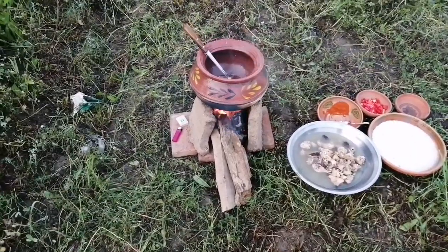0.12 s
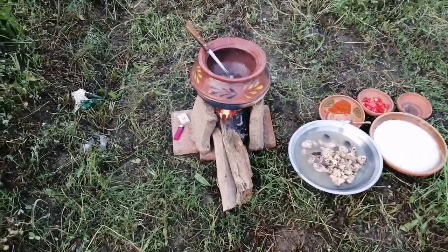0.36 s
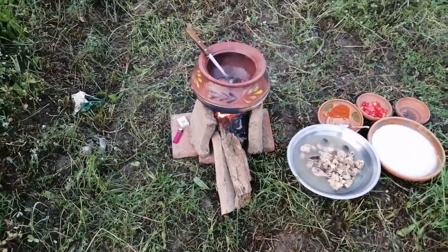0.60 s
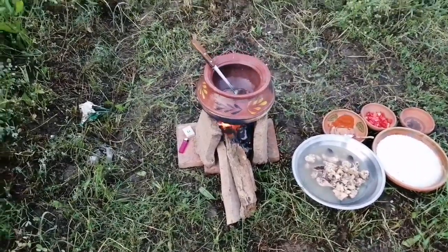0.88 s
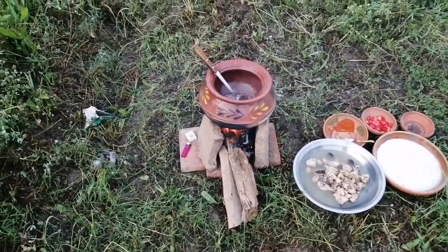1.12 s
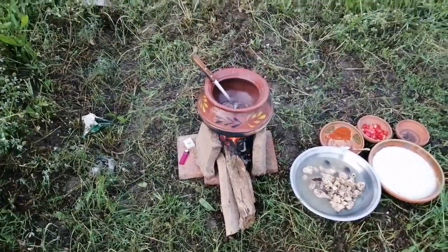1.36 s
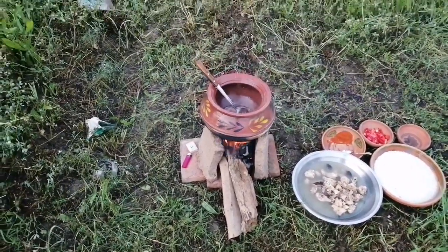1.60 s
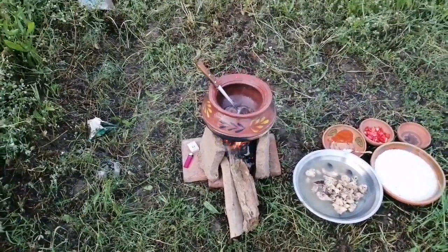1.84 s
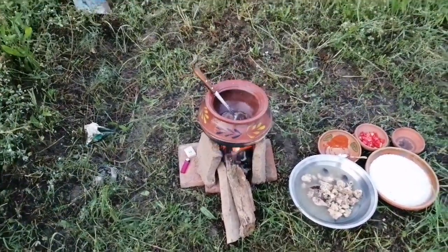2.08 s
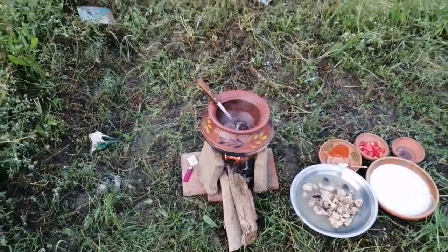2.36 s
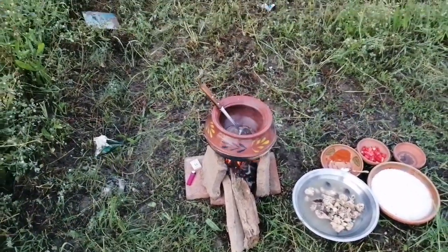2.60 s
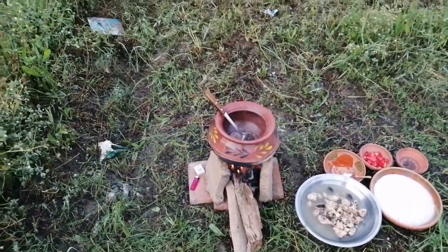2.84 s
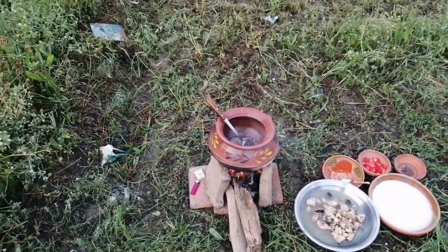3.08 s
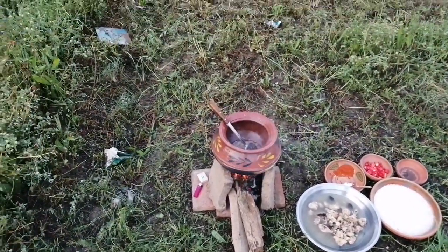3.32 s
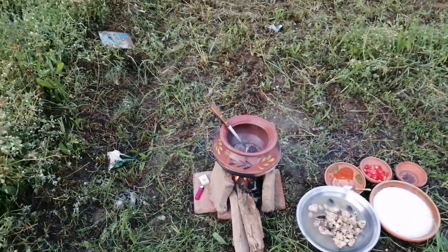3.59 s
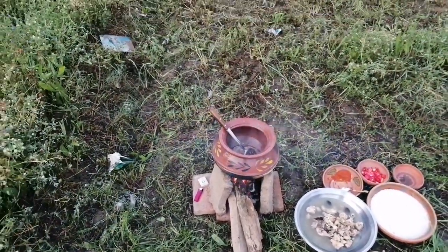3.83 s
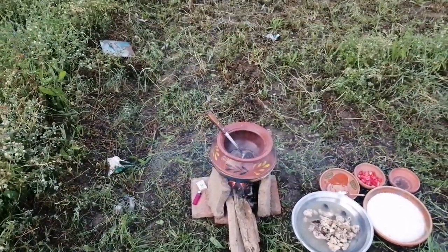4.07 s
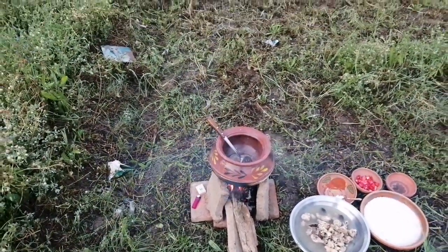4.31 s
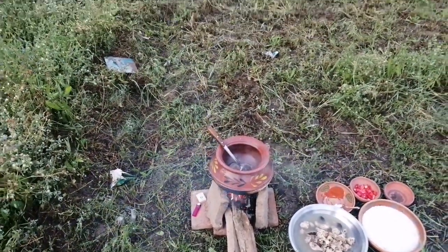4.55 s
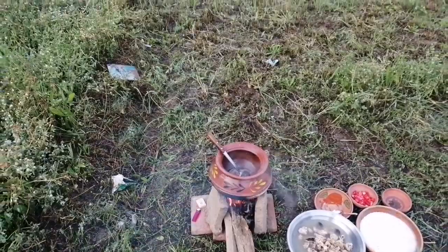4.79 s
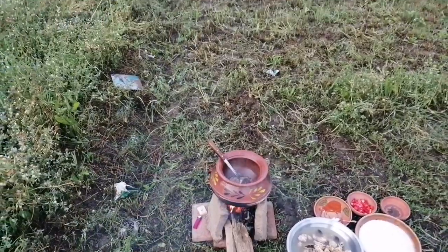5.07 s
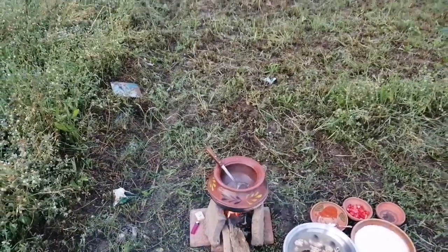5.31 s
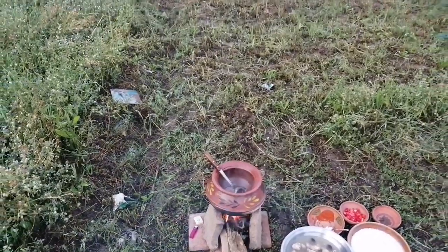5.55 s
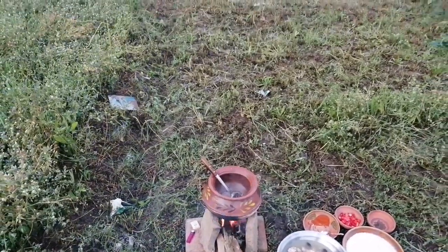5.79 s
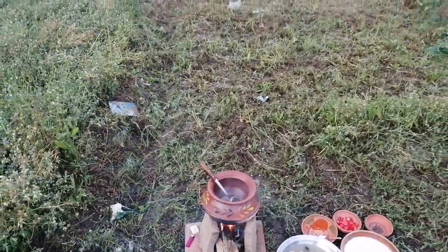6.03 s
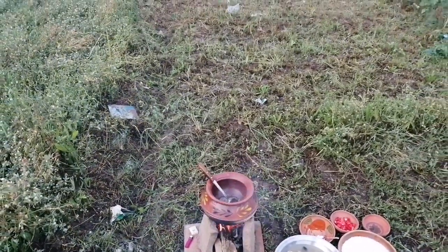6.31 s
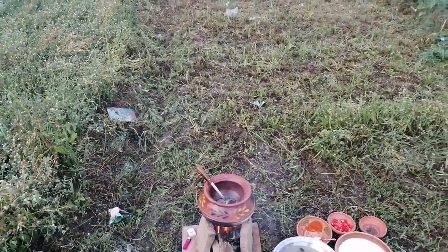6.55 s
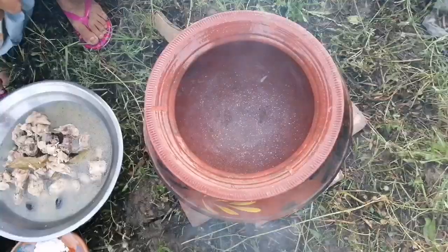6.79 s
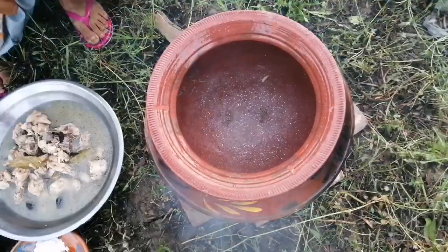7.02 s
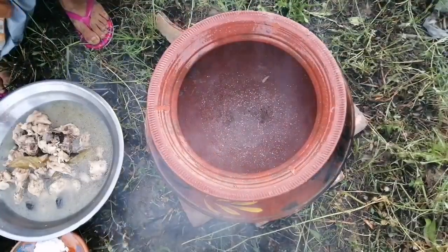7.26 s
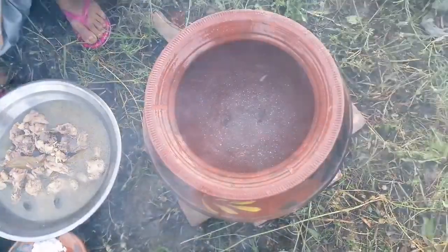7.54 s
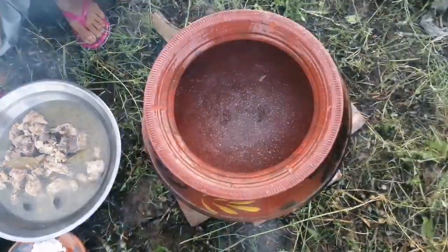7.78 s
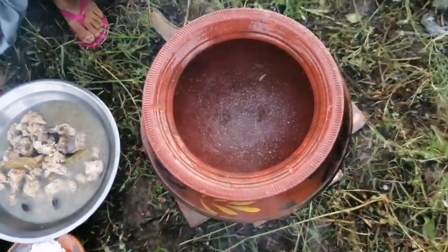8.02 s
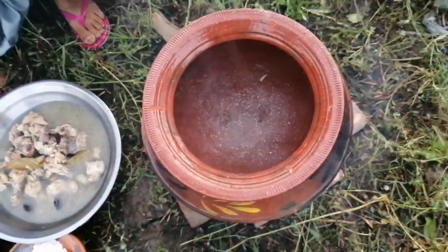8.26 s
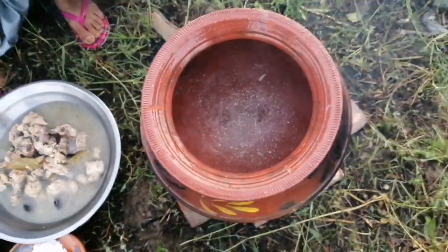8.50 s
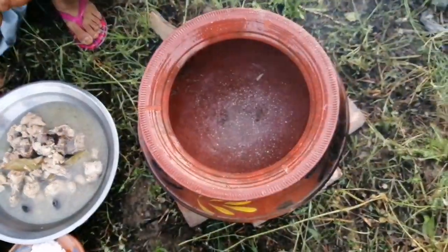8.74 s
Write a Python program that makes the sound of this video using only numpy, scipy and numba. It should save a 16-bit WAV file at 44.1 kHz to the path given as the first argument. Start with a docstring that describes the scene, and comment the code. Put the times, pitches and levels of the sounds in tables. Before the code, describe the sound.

Dense high insect chorus outdoors fades to a short gap, then returns from another angle with hollow little fire puffs and thin bird chirps.

```python
"""An open field at dusk: crickets trill on the left and, with much echo, toward the right (sinking wing-stroke
tones); a cicada swells on the right (clicks ring a drum); a small cricket chirps (short sinking strokes).
Birds whistle and twitter (gliding sines), hiss swells softly, and engines drone far off (low harmonics).
The sound fades out; after a short silence the microphone faces another way and fades in again,
to puffs of flame in a hollow cavity (bursts of its tone over a narrow roar). Air noise lies under it all."""
import sys
import numpy as np
from scipy import signal
from scipy.fft import rfft, irfft
from scipy.io import wavfile
from scipy.ndimage import uniform_filter1d
from numba import njit

SR = 44100
rng = np.random.default_rng(int(sys.argv[2]) if len(sys.argv) > 2 else 0)


def voltage_ratio(level):
    """Linear amplitude factor for a level in decibels (scalar or array-like)."""
    return 10 ** (np.asarray(level, float) / 20)


def store_wav(level_fs):
    """Save 16-bit WAV to argv[1]."""
    pcm = np.round(np.clip(np.atleast_2d(level_fs), -1, 1) * 32767)
    wavfile.write(sys.argv[1], SR, pcm.T.astype(np.int16))


N = 391608
TIME = np.arange(N) / SR
TURN_S = 6.8  # within the silence
TOP_HZ = 15800  # upper limit of the microphone signal

# microphone fade: (time [s], gain [0-1])
FADE_GAIN = [(0, 1), (5.2, 1), (6.705, .07), (6.712, 0), (6.936, 0), (6.945, .3), (7.1, 1), (8.88, 1)]
# trilling cricket groups: (time [s], high group level [dB], low group level [dB], right group level [dB])
TRILL_LEVELS = [(0.0, -51, -46, -60), (0.3, -57, -48.5, -62), (1.05, -56, -48.5, -62),
                (1.2, -47.5, -48.5, -63), (2.4, -48, -46.5, -62), (3.0, -46.5, -49, -64),
                (3.75, -48, -46, -63), (3.85, -55, -48, -64), (4.6, -51, -49, -62),
                (4.9, -45.5, -49.5, -63), (5.3, -45.5, -49.5, -58), (5.8, -48.5, -49, -57),
                (6.69, -48, -47, -57), (6.94, -50.5, -55.5, -59.5), (8.15, -52.5, -56, -61),
                (8.25, -62, -56, -64), (8.45, -60, -55, -63), (8.6, -50, -55, -59), (8.88, -49, -54.5, -57)]
# single trillers: (group [0 high, 1 low, 2 right], wing strokes [1/s], pitch at stroke start [Hz],
# fall of pitch [0-1], level in the group [dB], left minus right [dB])
TRILL_SINGERS = [(0, 54.3, 4460, .085, -0.5, 34), (0, 55.5, 4390, .1, -10.5, 22),
                 (1, 52.6, 4244, .13, -3.5, 24.5), (1, 56.2, 4205, .1, -7.5, 34),
                 (1, 53.6, 4308, .12, -5, 16.5), (0, 50.9, 4115, .08, -13, 21),
                 (2, 52.8, 4144, .1, -9.5, 0.5), (2, 56.3, 4310, .1, -7, -8.5),
                 (2, 54.6, 4430, 0, -10.5, -9.5), (2, 51.7, 4050, .09, -7.5, -4.5),
                 (0, 54.4, 4760, .06, -15.5, 14)]
# how a wing radiates: (frequency [Hz], relative level [dB])
WING_RADIATION = [(3700, -23.5), (4200, -19), (4600, -9), (7400, -1), (8400, 2), (8750, 0), (9300, -14),
                  (11300, -18.5), (12400, -13), (12900, -27), (14000, -30)]

# cicada swells: (peak time [s], level [dB], rise [s], fall [s])
CICADA_SWELLS = [(0, -54, .1, .08), (.15, -47.5, .06, .17), (.5, -54, .15, .1), (.69, -47, .1, .1),
                 (1.06, -47.5, .1, .1), (1.28, -53.5, .07, .12), (1.6, -48.5, .22, .13),
                 (1.92, -46.5, .08, .14), (2.23, -48, .13, .07), (2.39, -48.5, .06, .15),
                 (2.72, -51.5, .16, .07), (2.87, -47, .06, .09), (3.2, -46.5, .12, .13),
                 (3.54, -46.5, .09, .09), (3.88, -50, .1, .08), (3.7, -54, .1, .1), (4.13, -51, .08, .08),
                 (4.39, -49.5, .17, .1), (4.74, -46.5, .12, .09), (5.09, -47, .08, .11),
                 (5.45, -49.8, .11, .16), (5.72, -49, .12, .08), (6.06, -52, .12, .1),
                 (6.38, -49.5, .09, .22), (6.94, -45, .05, .06), (7.14, -44.5, .11, .11),
                 (7.48, -51, .06, .15), (7.68, -45, .09, .2), (7.98, -52, .1, .1), (8.2, -48, .17, .09),
                 (8.41, -47.8, .11, .13), (8.61, -48.5, .1, .08), (8.84, -44.5, .14, .1)]
# resonances of the cicada's drum: (multiple of the centre [1], width [Hz], relative level [dB])
DRUM_RESONANCES = [(.3, 726, -18), (1, 623, -0.5), (1.172, 684, -13), (1.74, 800, -21.5), (2, 510, -28)]
CICADA_REST_DB = -60  # drone between swells
# the drum tightens as the song grows louder; its slope in Hz per dB is given before and after the turn
DRUM_CENTRE_HZ, DRUM_HZ_PER_DB, DRUM_USUAL_DB = 5520, (12, 34), -49
CICADA_PAN_DB = (-18, -25)  # left minus right, before and after the turn

# small cricket, bouts of chirps: (first chirp [s], last chirp [s], first level [dB], last level [dB])
CHIRP_BOUTS = [(.166, .287, -51, -49), (.866, 1.826, -49, -48), (2.578, 3.545, -49, -53),
               (4.259, 4.74, -53, -52), (4.912, 6.241, -54, -49), (6.93, 8.455, -55, -49)]
CHIRP_EVERY_S = .119  # nearest spacing that fills each bout evenly
CHIRP_PAN_DB = (9, -2)  # left minus right, before and after the turn

# bird whistles: (start [s], length [s], start pitch [Hz], end pitch [Hz], mean level [dB])
BIRD_NOTES = [(.91, .04, 4100, 4760, -60), (.95, .025, 4770, 4680, -53), (.975, .1, 4660, 3300, -62.5),
              (1.135, .1, 4400, 3300, -67), (1.24, .08, 3250, 2920, -69), (1.44, .018, 3650, 4800, -56),
              (1.53, .012, 4200, 4700, -55), (1.745, .035, 3600, 4200, -68), (1.78, .032, 4200, 4500, -55),
              (1.885, .085, 3350, 4700, -66), (2.065, .02, 3950, 3800, -63), (2.225, .025, 4000, 3300, -64),
              (5.12, .06, 4000, 3300, -70), (5.26, .03, 3980, 3900, -67), (5.39, .03, 4600, 4750, -62),
              (5.42, .105, 4700, 3300, -65), (5.59, .08, 4260, 3300, -66), (5.69, .035, 3050, 2950, -66),
              (5.52, .06, 2400, 2300, -68), (5.82, .055, 3400, 4780, -64), (6.13, .1, 3400, 4500, -66),
              (7.125, .015, 4000, 4300, -52), (7.145, .013, 4400, 4750, -52), (7.29, .015, 4100, 4300, -60),
              (7.315, .03, 4100, 4800, -63), (7.64, .035, 5950, 5750, -45), (7.69, .03, 5600, 6000, -49),
              (7.717, .015, 3990, 4670, -55), (7.79, .015, 4000, 4750, -59), (7.675, .015, 4500, 4050, -56),
              (7.91, .008, 4220, 4700, -59), (8.845, .015, 3600, 4040, -58)]
FALL_BEND, BIRD_DB_PER_KHZ = 2.2, 6  # a fall drops fast, then levels off; high pitch is louder
# bird twitter, quick strokes up and down: (start [s], end [s], peak level before wavering [dB])
TWITTER_SPANS = [(7.09, 7.11, -59), (7.162, 7.18, -59), (7.61, 7.81, -61), (8.708, 8.81, -54.5),
                 (8.81, 8.88, -60)]
TWITTER_HZ, TWITTER_SWING_HZ, TWITTER_RATE_HZ = 4350, 560, 46  # swing and rate both vary about these

# puffs of flame: (time [s], peak level [dB], time from the peak to 1/e [s])
FLAME_PUFFS = [(7.513, -53, .019), (7.57, -46, .009), (7.591, -47, .006), (7.61, -48, .009),
               (7.652, -45.5, .014), (7.775, -54, .015), (7.85, -56, .022), (7.89, -58, .018),
               (7.977, -57, .018), (8.055, -53.5, .022), (8.119, -49.5, .012), (8.27, -55.7, .016),
               (8.409, -55, .014), (8.46, -56.5, .017), (8.646, -60, .016), (8.682, -54.5, .012),
               (8.752, -59, .008), (8.821, -55, .032)]
# pitch of the hollow cavity: (time [s], frequency [Hz])
CAVITY_PITCH = [(7.5, 400), (7.59, 422), (7.65, 385), (8.12, 398), (8.27, 372), (8.4, 395), (8.7, 410),
                (8.82, 438)]
# one small dry tick: (time [s], frequency [Hz], peak level [dB])
DRY_TICK = (7.595, 860, -51)
# soft swells of hiss: (centre frequency [Hz], level at the height [dB], start [s], end [s])
HISS_SWELLS = [(1600, -63, .04, .36), (2020, -63, 7.6, 7.76), (1850, -64, 8.35, 8.58)]

# far engine before the turn: (time [s], firing rate [Hz], level [dB])
FAR_ENGINE = [(0.0, 28.7, -62), (0.18, 29.7, -74), (0.74, 30.7, -65), (1.02, 29.7, -71), (1.43, 30.7, -69),
              (1.62, 30, -76), (1.78, 31.74, -63), (3.63, 33.1, -61.5), (5.62, 33.87, -63.5),
              (6.0, 34, -66), (6.68, 34.1, -63)]
# its multiples of the firing rate, from the first up: (relative level [dB])
FAR_ENGINE_ORDERS = [-21, 1.5, -10, -11.5, -10.5]
# far engine after the turn, rising briefly and then slowing: (time [s], firing rate [Hz], level [dB])
SLOWING_ENGINE = [(6.95, 51.8, -69), (7.126, 54.33, -69), (8.88, 40.8, -64.5)]
# its multiples of the firing rate, from the first up: (relative level [dB])
SLOWING_ENGINE_ORDERS = [0, -0.5, -16]
# faint wavering tones: (frequency [Hz], level [dB], start [s], end [s])
FAINT_TONES = [(165, -78, 7, 8.88), (1110, -83, 7, 8.88), (1590, -77, 8.0, 8.14), (575, -74, 7.05, 7.2),
               (237, -75.5, 7, 8.88), (757, -81, 0.2, 3.3), (826, -76, .3, .9), (1106, -82, 0, 4.3),
               (330, -74.5, 4.1, 4.2), (330, -74.5, 5, 5.1)]
# open air: (frequency [Hz], left and right before the silence [dB per Hz], left and right after it
# [dB per Hz], likeness of the two ears [-1 to 1])
AIR_SPECTRUM = [(15, -105, -105, -105, -105, 0.81), (35.1, -83.5, -84, -79, -81.5, 0.75),
                (109, -88, -86.5, -85.5, -85, 0.92), (257, -92, -94.5, -94, -93, 0.6),
                (775, -90.5, -92, -93, -95, 0.16), (1200, -96, -95, -98, -98.5, -.1),
                (2430, -100, -99, -101, -100, -0.093), (3300, -95.5, -98, -98.5, -99, 0.09),
                (4500, -93, -98, -94.5, -99, -0.28), (6200, -92, -87.5, -95, -91, 0.02),
                (7400, -91, -93, -89, -94, 0), (9200, -95.5, -100, -99.5, -99, 0),
                (10000, -104, -105.5, -107, -106, -0.061), (11120, -100.5, -108, -102, -106, 0),
                (13500, -104, -103, -105, -103, -0.16), (14300, -107, -107, -109, -108, 0),
                (15600, -102, -107, -106, -107, 0.33)]


def curve(rows):
    """Columns of a table against time, one value per sample."""
    s, *columns = np.transpose(rows)
    return [np.interp(TIME, s, c) for c in columns]


def unit(x):
    """Scale to rms 1."""
    return x / np.sqrt(np.mean(x ** 2))


def walk(rate):
    """Random levels held 1 / rate s and smoothed twice; spread near 1."""
    hold = int(SR / rate)
    steps = np.repeat(rng.standard_normal(N // hold + 1), hold)
    return 1.3 * uniform_filter1d(uniform_filter1d(steps, hold), hold)[:N]


def turned(pair):
    """The first value before the microphone turns, the second after."""
    return np.where(TIME < TURN_S, *pair)


def place(x, pan_db):
    """Stereo pair in which the nearer ear keeps the full level."""
    left_db = np.minimum(pan_db, 0 * x)
    right_db = np.minimum(-pan_db, 0 * x)
    return x * voltage_ratio(np.array([left_db, right_db]))


def cycles(hz):
    """Running count of cycles of a moving frequency."""
    return np.cumsum(hz + 0 * TIME) / SR


def foliage(x, t60, wet_db, sway=6):
    """Leaves and ground scatter a short echo to each ear; as they sway, one echo pattern blends into another."""
    age = np.arange(int(SR / 4)) / SR
    tails = rng.standard_normal((2, 2, len(age))) * np.exp(-np.log(1000) * age / t60)
    tails /= np.sqrt(np.sum(tails ** 2, axis=2, keepdims=True))
    angle = np.pi * walk(sway)
    echo = 0
    for blend, tail in zip((np.cos, np.sin), tails):
        echo = echo + signal.oaconvolve(x * blend(angle), tail, axes=1)[:, :N]
    return x + voltage_ratio(wet_db) * echo


@njit
def svf(x, hz, width):
    """State-variable band-pass with a moving centre, gain 1 there."""
    y, band, low = np.empty(len(x)), 0., 0.
    for i in range(len(x)):
        g, k = np.tan(np.pi * hz[i] / SR), width / hz[i]
        v = (band + g * (x[i] - low)) / (1 + g * (g + k))
        band, low, y[i] = 2 * v - band, low + 2 * g * v, k * v
    return y


def glide(rows, edge):
    """A sine that follows (time [s], frequency [Hz], rms level [dB]) rows, with soft ends of edge seconds."""
    out, (s, hz, db) = np.zeros(N), np.transpose(rows)
    span = slice(max(int((s[0] - edge) * SR), 0), int((s[-1] + edge) * SR))
    t = TIME[span]
    gate = np.clip(np.minimum(t - s[0], s[-1] - t) / edge + .5, 0, 1)
    phase = 2 * np.pi * np.cumsum(np.interp(t, s, hz)) / SR
    out[span] = np.sqrt(2) * gate * voltage_ratio(np.interp(t, s, db)) * np.sin(phase)
    return out


def trillers(closing=.72, skew=1.47, scatter_db=1.5, unsteady=.009):
    """Each wing stroke is a tone that sinks as the scraper slows; no two strokes are quite alike."""
    near, far = np.zeros((2, 2, N))
    group_db = curve(TRILL_LEVELS)
    for group, rate, top_hz, fall, db, pan_db in TRILL_SINGERS:
        # the wing sounds for the closing share of each cycle, then rests
        turn = (cycles(rate * (1 + .004 * walk(3))) + rng.random()) % 1
        stroke = np.minimum(turn / closing, 1)
        swell = np.sin(np.pi * stroke ** skew) * voltage_ratio(scatter_db * walk(rate))
        hz = top_hz * (1 - fall * stroke ** 2 + unsteady * walk(rate))
        phase = 2 * np.pi * cycles(hz)
        # the wing radiates each harmonic by where it lies
        wing_hz, wing_db = np.transpose(WING_RADIATION)
        song = swell * sum(voltage_ratio(np.interp(k * hz, wing_hz, wing_db)) * np.sin(k * phase) for k in (1, 2, 3))
        side = far if int(group) == 2 else near
        side += place(unit(song) * voltage_ratio(db + group_db[int(group)]), pan_db)
    # the group on the right is far off, with strong echo
    return foliage(near, t60=0.11, wet_db=-6) + foliage(far, t60=0.096, wet_db=-0.5)


def cicada(rate=260, scatter_db=4, hiss_db=0, wander_hz=35):
    """Ribs buckle in an uneven run of clicks that, with hiss, ring the resonances of the drum."""
    power = voltage_ratio(2 * CICADA_REST_DB)
    for s, level_db, rise, fall in CICADA_SWELLS:
        reach = np.where(TIME < s, rise, fall)
        power = power + voltage_ratio(2 * level_db) * np.exp(-2 * ((TIME - s) / reach) ** 2)
    db = 10 * np.log10(power)
    hz = DRUM_CENTRE_HZ + turned(DRUM_HZ_PER_DB) * (db - DRUM_USUAL_DB) + wander_hz * walk(3)
    click_size, click_sign, hiss = rng.standard_normal((3, N))
    turns = np.floor(cycles(rate * (1 + .35 * walk(70))))
    clicks = np.diff(turns, prepend=0) * voltage_ratio(scatter_db * click_size) * np.sign(click_sign)
    push = unit(clicks) + voltage_ratio(hiss_db) * hiss
    song = 0
    for multiple, width, level_db in DRUM_RESONANCES:
        ring = push
        for _ in range(3):
            ring = svf(ring, multiple * hz, 2. * width)
        song = song + voltage_ratio(level_db) * unit(ring)
    return foliage(place(song * voltage_ratio(db), turned(CICADA_PAN_DB)), t60=0.06, wet_db=-5)


def chirper(hz=7120, period=.014, length=.009, fall=.05, late_s=.003, scatter_db=1.2):
    """Four short sinking wing strokes a chirp, the first one weaker."""
    out, age = np.zeros(N), np.arange(int(length * SR)) / SR
    bouts = []
    for a, b, first_db, last_db in CHIRP_BOUTS:
        count = round((b - a) / CHIRP_EVERY_S) + 1
        bouts.append(np.linspace((a, first_db), (b, last_db), count))
    chirps = np.vstack(bouts)
    chirps = chirps + rng.standard_normal(chirps.shape) * (late_s, scatter_db)
    chance = rng.standard_normal((len(chirps), 4, 3))  # level, pitch and time of each stroke
    for (s, db), row in zip(chirps, chance):
        for k, stroke_db in enumerate([-2, 0, -0.5, 0.0]):
            stroke_hz = hz * (1 + 0.0043 * row[k, 1])
            phase = 2 * np.pi * stroke_hz * age * (1 - fall * (age / length - 1) / 2)
            level = voltage_ratio(db + stroke_db + 1.5 * row[k, 0])
            i = int((s + k * period + 0.00051 * row[k, 2] - length / 2) * SR)
            out[i:i + len(age)] += np.sin(np.pi * age / length) * np.sin(phase) * level
    return foliage(place(out, turned(CHIRP_PAN_DB)), t60=0.073, wet_db=-10)


def birds(waver_db=3, twitter_waver_db=5):
    """Thin gliding whistles and a fast-swinging twitter from the right waver on their way, with a little echo."""
    u, song = np.linspace(0, 1, num=12), 0
    for s, length, a, b, db in BIRD_NOTES:
        hz = b + (a - b) * (1 - u) ** (FALL_BEND if a > b else 1)
        note_db = db + BIRD_DB_PER_KHZ * (hz - hz.mean()) / 1e3
        song = song + glide(np.transpose([s + u * length, hz, note_db]), edge=0.0049)
    swing = np.cos(2 * np.pi * cycles(TWITTER_RATE_HZ * (1 + .25 * walk(30))))
    hz = TWITTER_HZ + TWITTER_SWING_HZ * voltage_ratio(2.5 * walk(40)) * swing
    on = 0
    for a, b, db in TWITTER_SPANS:
        on = on + voltage_ratio(db) * np.clip(np.minimum(TIME - a, b - TIME) / .005 + .5, 0, 1)
    twitter = on * voltage_ratio(twitter_waver_db * walk(120)) * np.sin(2 * np.pi * cycles(hz))
    return foliage(place(song * voltage_ratio(waver_db * walk(60)) + twitter, -16), t60=.2, wet_db=-9)


def hollow(roar_db=-66):
    """Puffs of flame ring a cavity for a few cycles each, over a faint roar in the same resonance; one dry tick."""
    hz = curve(CAVITY_PITCH)[0]
    roar = voltage_ratio(roar_db) * unit(svf(rng.standard_normal(N), hz, 65.0)) * (TIME > FLAME_PUFFS[0][0])
    swell = sum(voltage_ratio(db) * np.exp(-((TIME - t) / length) ** 2) for t, db, length in FLAME_PUFFS)
    puffs = swell * np.sin(2 * np.pi * cycles(hz))
    t, tick_hz, db = DRY_TICK
    tick = voltage_ratio(db) * np.exp(-((TIME - t) / 0.0026) ** 2) * np.sin(2 * np.pi * tick_hz * (TIME - t))
    return place(roar + puffs, 3.6) + tick


def hisses(width=260.):
    """Brief soft swells of noise in a narrow band, from the right."""
    noise, out = rng.standard_normal(N), 0
    for hz, db, a, b in HISS_SWELLS:
        swell = np.sin(np.pi * np.clip((TIME - a) / (b - a), 0, 1))
        out = out + swell * voltage_ratio(db) * unit(svf(noise, hz + 0 * TIME, width))
    return place(out, -5)


def engine(rows, orders_db, flutter_db):
    """Low multiples of the firing rate; the air on the way makes each one flutter."""
    hz, db = curve(rows)
    phase = 2 * np.pi * cycles(hz * (1 + 0.0059 * walk(6)))
    on = (TIME >= rows[0][0] - .05) & (TIME < rows[-1][0] + .05)
    drone = 0
    for order, order_db in enumerate(orders_db, 1):
        drone = drone + voltage_ratio(order_db + flutter_db * walk(9)) * np.sqrt(2) * np.sin(order * phase)
    return on * voltage_ratio(db) * drone


def hums():
    """Faint sine tones that flicker in level."""
    return sum(glide([(a, hz, db), (b, hz, db)], edge=.04) * voltage_ratio(4.4 * walk(25)) for hz, db, a, b in FAINT_TONES)


def air(flicker_db=1.1):
    """Distant hiss and rumble, most alike in both ears in the bass; octaves drift apart, after the silence as one."""
    hz = np.maximum(np.arange(N // 2 + 1) * SR / N, 1)
    table = np.transpose(AIR_SPECTRUM)
    *db, alike = (np.interp(np.log(hz), np.log(table[0]), c) for c in table[1:])
    alike = np.clip(alike, -1, 1)
    # a shared and an opposed noise, mixed to give the likeness
    mid, side = rfft(rng.standard_normal((2, N)))
    shared, opposed = np.sqrt(1 + alike) * mid, np.sqrt(1 - alike) * side
    ears = np.array([shared + opposed, shared - opposed]) * np.sqrt(SR) / 2
    octave = np.round(np.log2(hz / 30)).clip(0, 9)
    before = 0
    for k in range(10):
        band = irfft(ears * voltage_ratio(np.array(db[:2])) * (octave == k), N)
        before = before + band * voltage_ratio(flicker_db * walk(5))
    after = irfft(ears * voltage_ratio(np.array(db[2:])), N) * voltage_ratio(flicker_db * walk(4))
    return np.where(TIME < FADE_GAIN[4][0], before, after)  # swapped at the end of the silence


def scene():
    """All singers, the flames and the far engines over the open air."""
    engines = engine(FAR_ENGINE, FAR_ENGINE_ORDERS, flutter_db=1.6)
    engines = engines + engine(SLOWING_ENGINE, SLOWING_ENGINE_ORDERS, flutter_db=1)
    return trillers() + cicada() + chirper() + birds() + hollow() + hisses() + engines + hums() + air()


def top_cut(x):
    """Nothing passes above the cut-off."""
    return signal.sosfilt(signal.butter(12, 15990, fs=SR, output="sos"), x)


def record(dry):
    """The microphone signal fades out, falls silent and fades in; a steep low-pass cuts the top."""
    faded = dry * curve(FADE_GAIN)[0]
    low_pass = signal.ellip(10, .2, 70, TOP_HZ, fs=SR, output="sos")  # ripple .2 dB, stop band -70 dB
    mix = signal.sosfilt(low_pass, faded)
    return top_cut(mix)


dry = scene()
out = record(dry)
store_wav(out)
```